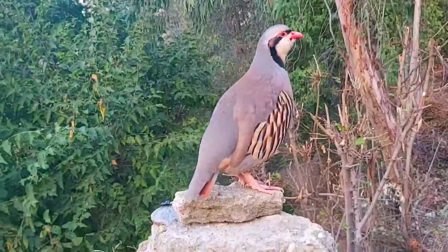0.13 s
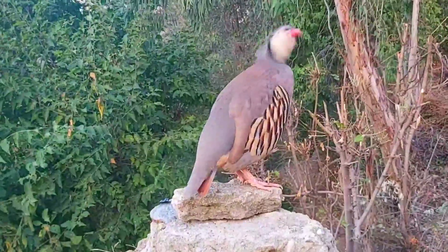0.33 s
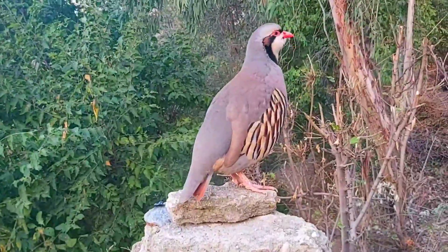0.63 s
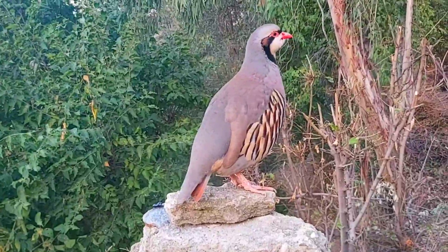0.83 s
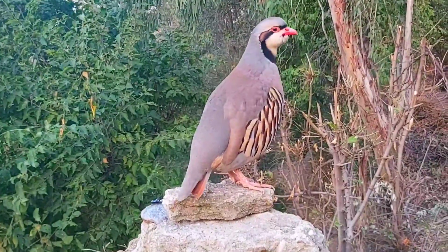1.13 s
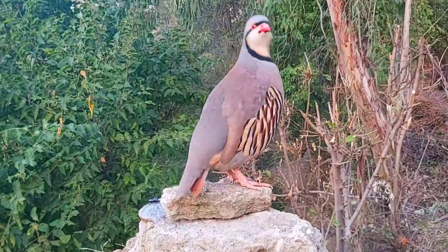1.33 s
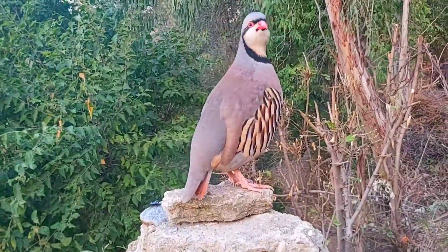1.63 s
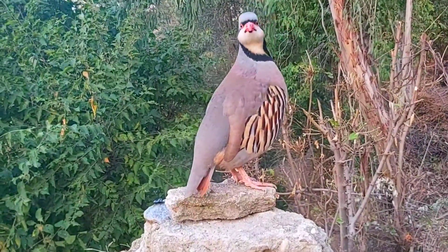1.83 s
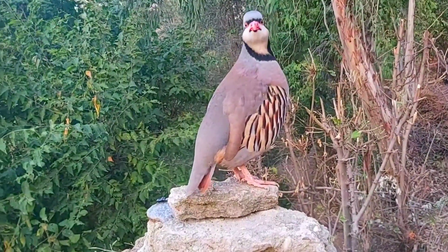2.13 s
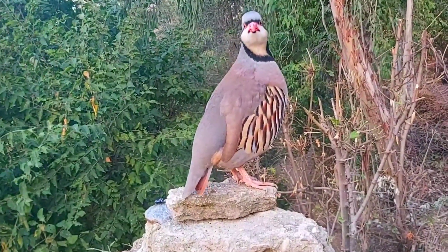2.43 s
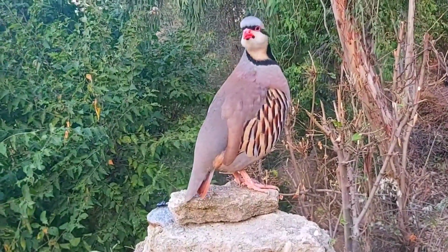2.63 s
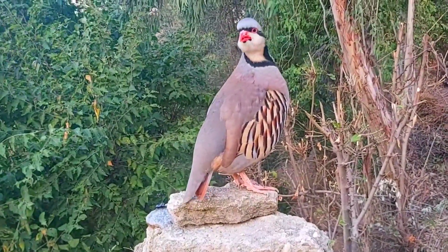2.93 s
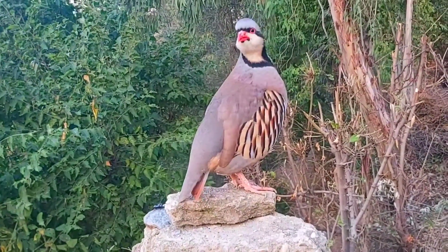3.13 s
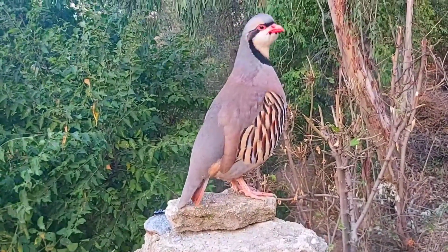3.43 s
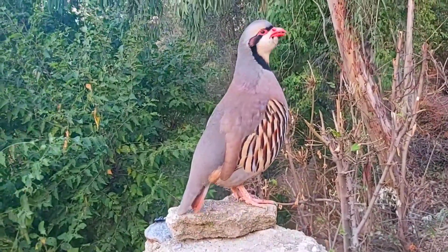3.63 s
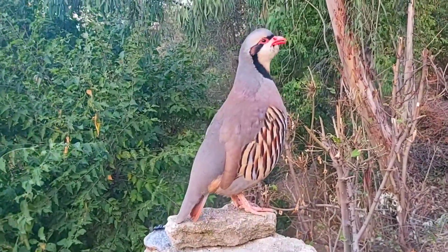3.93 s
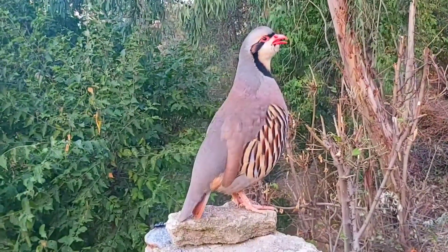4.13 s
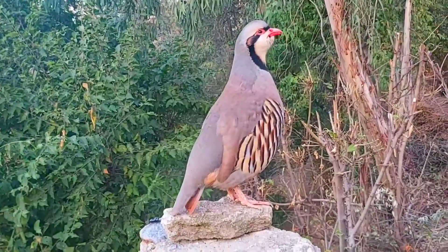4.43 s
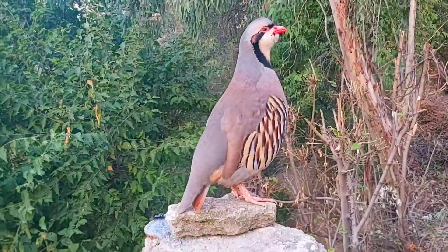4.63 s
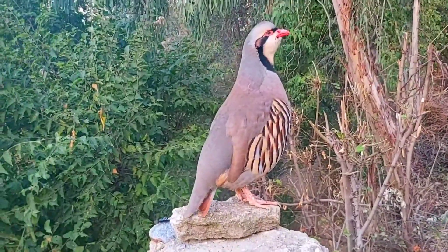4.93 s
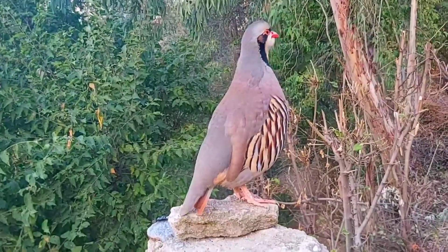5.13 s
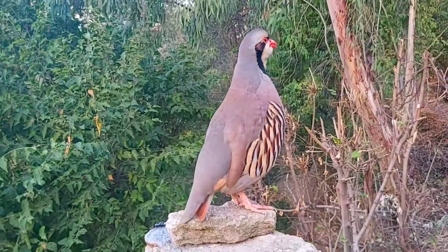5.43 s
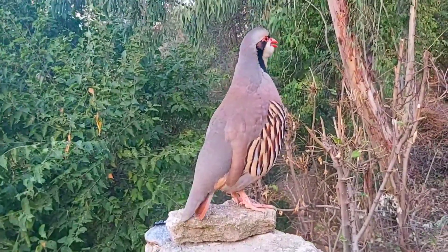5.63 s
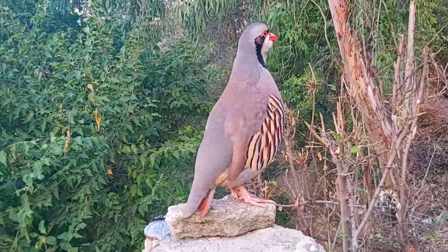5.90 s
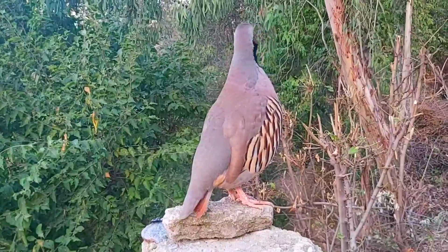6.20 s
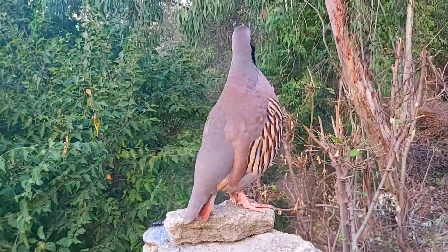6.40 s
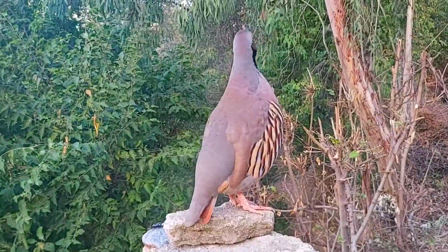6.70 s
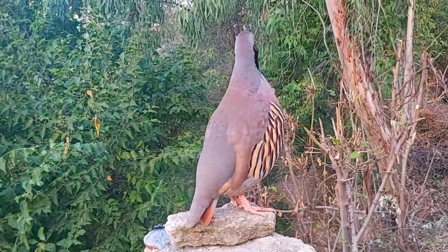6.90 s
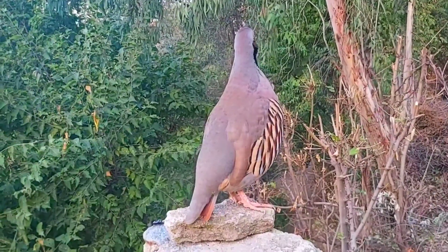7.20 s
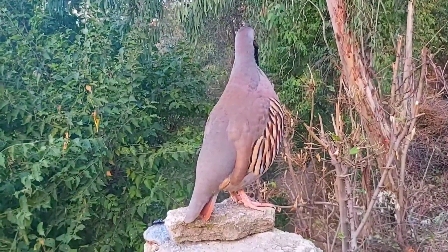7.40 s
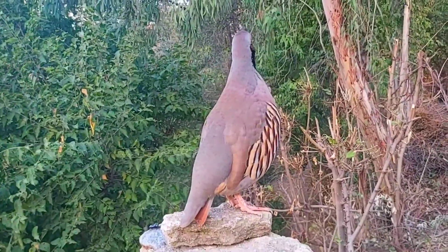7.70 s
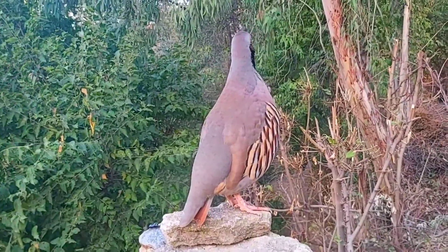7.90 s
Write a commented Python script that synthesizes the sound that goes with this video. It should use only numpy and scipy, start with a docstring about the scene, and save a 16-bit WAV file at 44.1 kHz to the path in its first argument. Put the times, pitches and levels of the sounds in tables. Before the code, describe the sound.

A chukar partridge on a rock calls close to the microphone in a quiet wooded hollow. It starts with soft, evenly spaced clucks, each followed by a lower mutter, then adds sharper falling yelps. These become loud, harsh, buzzy chuck-chu-kar phrases, quick and regular, repeated without pause until they stop abruptly. A soft rustle and faint hoarse calls in the bushes remain, with a slight short echo and very quiet air.

```python
"""Chukar partridge on a rock

A chukar partridge calls close to the microphone in a quiet wooded hollow. Soft clucks, some answered by low
mutters, grow into loud, harsh chuck-chu-kar phrases and stop. Each note is one or two pushes of air: a gliding
tone and a partly chaotic buzz of the syrinx (the bird's voice organ), heard through throat, chest and beak.
Faint calls, shuffles, thuds and far-off tones surround it; slope and bushes return a faint echo in soft air.
"""
import sys
import numpy as np
from scipy import signal
from scipy.fft import rfft, irfft, next_fast_len
from scipy.io import wavfile
from scipy.ndimage import uniform_filter1d, minimum_filter1d

SR = 44100
rng = np.random.default_rng(int(sys.argv[2]) if len(sys.argv) > 2 else 0)


def transcribe(signal):
    """Save signal, clipped to [-1, 1], as a 16-bit WAV file at the path in sys.argv[1]."""
    frames = np.atleast_2d(signal).T
    limited = np.clip(frames, -1, 1)
    pcm = np.round(limited * 32767).astype(np.int16)
    wavfile.write(sys.argv[1], SR, pcm)


N = 355181

# Colour of the rasp through a nearly closed beak. Each row: frequency in Hz, relative level in dB.
BEAK_CLOSED = [(900, -35.5), (1400, -5), (1640, 11), (1950, -14), (2280, 5.5), (2500, -6), (3000, -19),
               (3500, -15), (4100, -12.5), (4750, -6), (5200, -19.5), (5700, -4.5), (6600, -22),
               (8100, -39), (10000, -37.5), (15500, -35)]
# Beak open towards the listener. Each row: frequency in Hz, relative level in dB.
BEAK_FRONT = [(1400, -28), (1900, -10.5), (2300, 4), (2500, -17), (2900, -28.5), (3400, -10), (4050, -16.5),
              (4750, -2), (5250, -24), (5700, -12.5), (6500, -35.5), (8500, -42), (10000, -32.5),
              (15500, -29)]
# Beak open across the listener. Each row: frequency in Hz, relative level in dB.
BEAK_SIDE = [(1400, -27.5), (1950, -8.5), (2300, -4), (2550, -19.5), (3050, -25.5), (3700, -5.5),
             (4050, -13.5), (4450, 4), (5350, -35.5), (6400, -27), (7100, -15.5), (8500, -66),
             (9900, -27.5), (15500, -33.5)]
# Beak open away from the listener. Each row: frequency in Hz, relative level in dB.
BEAK_BACK = [(1400, -27.5), (1950, -14), (2300, -6), (2550, -13.5), (3050, -18), (3600, -7.5), (4350, 0),
             (4750, -18), (5300, -37), (5900, -27.5), (7000, -24), (8400, -70), (9900, -40.5), (15500, -50)]
# Beak open while the head is turning. Each row: frequency in Hz, relative level in dB.
BEAK_TURNING = [(1400, -29.5), (1950, -11), (2300, -6), (2550, -14), (3050, -22), (3700, -5.5), (4050, -9),
                (4400, -2), (5300, -38), (6300, -25.5), (7100, -19.5), (8500, -67.5), (9900, -30),
                (15500, -49.5)]
# Signs that put a sound into left and right with opposite polarity. Each row: the factor of one channel.
LEFT_RIGHT = np.array([[1], [-1]])


def undb(db):
    """Turn decibels into a gain."""
    return 10 ** (np.asarray(db) / 20)


def unit(x):
    """Scale to an rms (average strength) of 1."""
    return x / np.sqrt(np.mean(x ** 2) + 1e-20)


def along(points, hz):
    """Read (Hz, value) points on a log-frequency axis."""
    f, value = np.transpose(points)
    return np.interp(np.log(hz + 1), np.log(f), value)


def colour(x, points):
    """Filter by a (Hz, dB) spectrum."""
    n = x.shape[-1]
    size = next_fast_len(n)
    gain = undb(along(points, np.fft.rfftfreq(size, 1 / SR)))
    return irfft(rfft(x, size) * gain, size)[..., :n]


def resonate(x, hz, width_hz):
    """Let one resonance ring, with gain 1 at its centre."""
    b, a = signal.iirpeak(hz, hz / width_hz, fs=SR)
    return signal.lfilter(b, a, x)


def wander(n, rate):
    """Make smooth random motion with about `rate` turns a second and rms 1."""
    k = max(int(SR / rate), 1)
    smooth = uniform_filter1d(rng.standard_normal(n), k)
    return unit(uniform_filter1d(smooth, k))


def swell(t, rise, fall, roundness=1.865):
    """Rise from t = 0 and fall again, both rounded; times in seconds."""
    ramp = np.interp(t, [0, rise, rise + fall], [0, 1, 0])
    return np.sin(np.pi / 2 * ramp) ** roundness


def blown(x, push):
    """Give x the envelope `push`, with rms about 1 at its top."""
    return unit(x * push) * np.sqrt(np.mean(push ** 2))


def blend(clean, noisy, share):
    """Mix two sounds; `share` is the noisy part of the power, 0-1."""
    share = np.clip(share, 0, 1)
    return np.sqrt(1 - share) * unit(clean) + np.sqrt(share) * unit(noisy)


def add(out, x, start):
    """Mix x into out from `start` seconds."""
    i = max(int(start * SR), 0)
    out[..., i:i + x.shape[-1]] += x[..., :N - i]


def partridge():
    """Sing every note push by push, with the beak colour of the current head pose."""
    # Head poses. Each row: start in seconds, beak spectrum.
    poses = [(0, BEAK_CLOSED), (1.95, BEAK_FRONT), (3.55, BEAK_SIDE), (5.2, BEAK_TURNING),
             (6.27, BEAK_BACK)]
    # Six note shapes of one or two air pushes: a soft cluck, a low mutter, a falling yelp, the chuck, chu and kar.
    # Each row: start, rise and fall as shares of the note, level in dB, tone glide in octaves, buzz in Hz,
    # break-up 0-1, chest offset in dB, rasp offset in dB.
    cluck = [(0.0069, .57, 0.38, 0.02, -.2, 440, 0.15, -8.5, 0.005)]
    mutter = [(0, .26, .27, 0.044, -.7, 439.9, 0.011, -2, -17),
              (.43, 0.19, 0.37, 0.019, -0.73, 391.7, 0.32, 0.5, -18.5)]
    yelp = [(0.014, 0.39, .57, 0.0029, -.9, 415, 0.0051, 0.83, 0.088)]
    chuck = [(0, .31, .25, 0.01, -.2, 406.7, 0.058, -6.5, -2),
             (.35, .27, 0.3645, 0, -0.3493, 404.2, .4, 0, 0.23)]
    chu = [(0, .38, .28, 0.003, -.3, 439.9, 0.19, -9, 0), (.27, .25, .48, 0, -.4, 373.8, 0.75, -9, -5.5)]
    kar = [(0, .38, 0.15, 0.015, .3, 392.8, 0.54, -7, -7),
           (.36, .24, .4, 0, -0.365, 426.2, 0.046, 1.5, 0.5)]
    # Single soft clucks, then falling yelps.
    # Each row: start in seconds, length in seconds, level in dB, middle tone in Hz, roughness 0-1.
    clucks = [(.199, 0.051, -21, 948.4, 0.6), (0.573, 0.051, -19.5, 961, 0.33),
              (.971, 0.052, -18.5, 988, 0.65), (1.358, .047, -15, 1006, 0.65),
              (1.711, .052, -19, 825.5, 0.7), (3.332, .054, -20, 811, 0.77)]
    yelps = [(2.465, .054, -13, 1130, 0.37), (2.692, 0.045, -13.5, 1100, 0.26),
             (2.861, .051, -13, 1160, 0.54), (3.19, 0.058, -12.5, 1150, 0.34),
             (3.601, .051, -10, 1270, 0.6), (3.981, 0.053, -11, 1170, 0.35)]
    # Two-push notes: mutters that answer the first clucks, the long chuck that opens a phrase,
    # the short open chu in its middle and the swelling kar that closes it.
    # Each row: start in seconds, length in seconds, level in dB, middle tone in Hz, roughness 0-1,
    # second push in dB, turning point as a share of the note.
    mutters = [(0.307, 0.044, -24.5, 998.5, 0.74, -14, 0.81), (0.666, 0.066, -29, 880, 0.65, 0, 0.6),
               (1.069, .075, -22, 940, 0.42, -8.5, 0.38), (1.444, .08, -27, 940, 0.5, 3, .5),
               (1.808, 0.061, -22.5, 931, 0.65, -1, 0.48)]
    chucks = [(2.039, 0.096, -12, 1200, .6, -3, 0.43), (2.265, 0.083, -11.5, 1153, 0.26, -0.5, 0.41),
              (2.992, 0.092, -9.5, 1190, 0.34, -0.5, 0.36), (3.736, 0.076, -9.5, 1320, .65, -3, 0.52),
              (4.389, 0.074, -9, 1340, 0.77, -3, 0.59), (4.807, 0.085, -11.5, 1260, .65, 2, 0.54),
              (5.255, 0.082, -9.5, 1384, .5, -1, 0.45), (5.698, .08, -12.5, 1292, .65, 1.5, .56),
              (6.143, 0.078, -8, 1280, 0.46, -1, 0.51), (6.592, 0.083, -10, 1350, 0.42, 0, 0.53),
              (7.087, 0.076, -12.5, 1275, .6, 3, 0.57)]
    chus = [(2.61, 0.05, -8.5, 1201, 0.099, -7, 0.55), (4.118, 0.056, -12, 1094, 0.55, -3.5, .42),
            (4.551, 0.069, -7.5, 1129, .6, -8, 0.43), (4.978, 0.075, -11.5, 1138, 0.78, -9, .5),
            (5.423, 0.057, -9, 1200, .5, -18, 0.66), (5.869, 0.057, -8, 1198, 0.45, -12, .45),
            (6.312, .063, -6.5, 1293, 0.33, -11.5, .44), (6.773, 0.062, -12.5, 1092, 0.65, -11, .42),
            (7.258, 0.052, -14, 1209, 0.47, -1, 0.73)]
    kars = [(3.429, 0.067, -20.5, 1196, 0.69, 7.7, .55), (3.804, 0.066, -12, 1218, 0.44, 2.4, 0.54),
            (4.212, .069, -15, 1205, .6, 4, 0.46), (4.638, 0.056, -15, 1211, .5, 7.8, 0.32),
            (5.077, 0.062, -13.5, 1209, .45, 4.4, .5), (5.518, 0.073, -16.5, 1250, 0.51, 6.9, .5),
            (5.959, .076, -15.5, 1214, 0.61, 7.6, .48), (6.406, 0.075, -17, 1252, .65, 7, .5),
            (6.869, 0.098, -18, 1200, .6, 7.5, 0.54), (7.354, 0.066, -18, 1172, .5, 8.3, .48)]
    kinds = ((cluck, clucks), (mutter, mutters), (yelp, yelps), (chuck, chucks), (chu, chus), (kar, kars))

    out = np.zeros((2, N))
    t = np.arange(4096) / SR - .01  # starts early, to leave room before the push
    for shape, notes in kinds:
        for row in notes:
            beak = [spectrum for since, spectrum in poses if since <= row[0]][-1]
            for push in note(shape, *row):
                add(out, syllable(t, push, beak), push[0] + t[0])
    return out


def note(shape, start, length, db, tone_hz, rough, second_db=0, turn=.5):
    """Stretch a shape to the note's length, leaning early or late about the turning point."""
    # Rasp and chest over the whole bout: the rasp tends to grow, the chest is strongest in the first loud notes.
    # Each row: time in seconds, base rasp level in dB, base chest level in dB.
    bout = [(.2, -34, -40), (.6, -35.5, -37), (1.35, -30, -34), (1.8, -31, -33.5), (2.05, -38, -31.5),
            (2.6, -35.5, -30), (3.0, -32.5, -32), (3.35, -40.5, -35.5), (3.65, -32, -34),
            (4.15, -31.5, -35), (4.5, -27.5, -34), (5.0, -29.5, -36.5), (5.7, -32.5, -37.5),
            (6.4, -28, -36.5), (6.85, -31.5, -37), (7.4, -32, -39)]
    times, rasps_db, chests_db = np.transpose(bout)
    for push, accent_db in zip(shape, (0, second_db)):
        at, up, down, push_db, glide, buzz_hz, break_up, chest_db, rasp_db = push
        shares = np.interp([at, at + up, at + up + down], [0, .5, 1, 2], [0, turn, 1, 2])
        begin, peak, end = start + length * shares
        level_db = db + push_db + accent_db
        first_hz, last_hz = tone_hz * 2 ** (glide * np.array([-.5, .5]))
        push_rough = rough + break_up * (1 - rough)
        # chest and rasp follow the bout, not the loudness of the single note
        low_db = np.interp(start, times, chests_db) + chest_db - level_db
        edge_db = np.interp(start, times, rasps_db) + rasp_db - level_db
        yield (begin, peak - begin, end - peak, level_db, first_hz, last_hz, buzz_hz,
               push_rough, low_db, edge_db)


def syllable(t, row, beak, centre_hz=1200, chest_lag=0.0057, chest_noise=0.16, rasp_lead=0.2,
             rasp_linger=0.00055, cry_db=0.76, chest_trim_db=0.62, rasp_trim_db=0.24):
    """Sound one push of air from throat, chest and beak; lag and linger in s, lead a share of the rise."""
    # Low flutter of the chest. Each row: frequency in Hz, relative level in dB.
    chest_band = [(30, -30.5), (110, -23), (200, -17), (320, 0), (420, -9), (560, 0), (900, -36.5),
                  (2000, -69.5)]
    _, rise, fall, db, first_hz, last_hz, _, rough, chest_db, rasp_db = row
    rise, fall = max(rise, .004), max(fall, .004)
    rough = np.clip(rough, 0, .85)
    tone, buzz = syrinx(t, row)
    # the throat resonance half follows the tone
    throat_hz = (centre_hz + (first_hz + last_hz) / 2) / 2
    throat = cry(tone, buzz, swell(t, rise, fall), rough, throat_hz)
    # the buzz itself radiates from the chest, a little late
    hum = colour(np.sin(buzz), chest_band)
    breath = colour(turbulence(buzz), chest_band)
    chest = blown(blend(hum, breath, chest_noise), swell(t - chest_lag, rise, fall))
    # the rasp bites before the tone is at its loudest
    lead = np.clip(rasp_lead, 0, .5) * rise
    edge = rasp(buzz, swell(t, rise - lead, fall + lead + rasp_linger), rough, beak)
    voice = undb(cry_db) * throat
    voice = voice + undb(chest_db + chest_trim_db) * chest
    return undb(db) * (voice + undb(rasp_db + rasp_trim_db) * edge)


def syrinx(t, row, sag_rate=10, lowest_hz=285):
    """Make the phases of two voices, a strong gliding tone and a lower buzz; roughness shakes both."""
    _, rise, fall, _, first_hz, last_hz, buzz_hz, rough, chest_db, _ = row
    from_peak = np.clip(t, -.005, rise + fall + .005) - rise
    glide = (last_hz - first_hz) / (rise + fall)  # Hz per second
    peak_hz = first_hz + glide * rise
    waver = 1 + .09 * rough * wander(len(t), 160)
    # a tense buzz follows the tone; a slack one sags as the air runs out and sounds more from the chest
    slack = np.interp(chest_db, [-30, -24], [0, 1])
    bend = (1 - slack) * glide / peak_hz - slack * sag_rate  # share of the buzz pitch per second
    tone_path = peak_hz + glide * from_peak
    buzz_path = np.maximum(buzz_hz * (1 + bend * from_peak), lowest_hz)
    return 2 * np.pi * np.cumsum(np.array([tone_path, buzz_path]) * waver, axis=1) / SR


def turbulence(buzz):
    """Pulse air noise, as it escapes when the membranes open, over a steady hiss."""
    return rng.standard_normal(len(buzz)) * (0.31 + np.cos(buzz / 2) ** 4)


def cry(tone, buzz, push, rough, throat_hz, buzz_depth=0.48, throat_width_hz=400):
    """Chop the tone by the buzz; driven hard, pulses go strong-weak and then chaotic."""
    # Band that the throat lets out. Each row: frequency in Hz, level in dB.
    throat_band = [(150, -43), (400, -22), (600, -16), (730, -5), (1000, -2), (1400, -1.5), (1580, -13.5),
                   (1800, -28.5), (2400, -40), (4000, -78.5)]
    doubling = .8 * rough ** 2 * np.cos(buzz / 2 + rng.uniform(0, 2 * np.pi))  # half the buzz rate
    voiced = np.sin(tone) * np.exp(buzz_depth * np.cos(buzz) + doubling)
    harsh = resonate(colour(turbulence(buzz), throat_band), throat_hz, throat_width_hz)
    chaos = .7 * rough ** 2
    mixed = blend(colour(voiced, throat_band) * push, harsh * push, chaos)
    return mixed * np.sqrt(np.mean(push ** 2))


def rasp(buzz, push, rough, beak, noise_share=0.42, flutter_db=1.0, flutter_rate=100):
    """Send overtones and fluttering hiss through a beak whose gape differs a little each time, in stereo."""
    # Treble that differs between the two ports. Each row: frequency in Hz, level in dB.
    spray = [(1500, -21.5), (4500, -15.5), (7000, -11.5), (10000, -5.5)]
    gape = 1 + .02 * rng.standard_normal()
    beak = [(hz * gape, db) for hz, db in beak]
    overtones = np.cos(np.outer(np.arange(1, 27), buzz)).sum(axis=0)
    flutter = undb(flutter_db * wander(len(buzz), flutter_rate))
    edge = blend(overtones, turbulence(buzz), noise_share + .5 * rough)
    mid = blown(flutter * colour(edge, beak), push)
    hiss = blown(flutter * colour(turbulence(buzz), beak), push)
    return mid + colour(hiss, spray) * LEFT_RIGHT


def faint_calls(width_hz=170, upper_width_hz=170):
    """Make short hoarse notes in the bushes: noise through a low and a high narrow resonance."""
    # Each row: middle in seconds, length in seconds, pitch in Hz, level in dB,
    # upper partial in Hz, its level against the lower one in dB.
    calls = [(0.448, 0.029, 1700, -55, 4000, -23), (0.521, 0.056, 1670, -52.5, 4130, -18),
             (7.66, 0.075, 1160, -57.5, 3830, -15), (7.824, 0.04, 1280, -59, 3900, -11),
             (7.983, 0.061, 1306, -60.5, 3850, -10.5)]
    out = np.zeros(N)
    t = np.arange(4096) / SR
    for s, length, hz, db, upper_hz, upper_db in calls:
        breath = rng.standard_normal(len(t))
        push = swell(t, length / 2, length / 2)
        # each resonance is applied twice, the second time twice as wide
        low = resonate(resonate(breath, hz, width_hz), hz, 2 * width_hz)
        high = resonate(resonate(breath, upper_hz, upper_width_hz), upper_hz, 2 * upper_width_hz)
        call = blown(low, push) + undb(upper_db) * blown(high, push)
        add(out, undb(db) * call, s - length / 2)
    return out


def shuffles(grain_db=3):
    """Make dull rustles that die away: coloured noise of uneven strength."""
    # Soft shuffles. Each row: start in seconds, rise in seconds, decay time in seconds, level in dB.
    moves = [(0.0, 0.0017, 0.081, -51), (7.452, 0.012, 0.04, -37)]
    # Their colour. Each row: frequency in Hz, relative level in dB.
    rustle_colour = [(35, -46), (60, -33), (202, -14.5), (295, -5.5), (364, -2.5), (520, -2.5), (842, -12),
                     (1580, -11.5), (2000, -21), (2400, -39), (4320, -32), (9000, -74), (11700, -93),
                     (19800, -120)]
    out = np.zeros(N)
    t = np.arange(SR // 2) / SR
    for s, rise, decay, db in moves:
        grain = rng.standard_normal(len(t)) * undb(grain_db * wander(len(t), 81))
        rustle = unit(colour(grain, rustle_colour))
        envelope = np.interp(t, [0, rise], [0, 1]) * np.exp(-t / decay)
        add(out, undb(db) * rustle * envelope, s)
    return out


def thuds(first_hz=190, last_hz=80, length=0.031):
    """Make soft low bumps: short sine swells that fall in pitch; length in seconds."""
    # Each row: middle in seconds, peak level in dB.
    bumps = [(0.64, -52), (1.516, -45.5)]
    out = np.zeros(N)
    t = np.arange(SR // 8) / SR
    phase = 2 * np.pi * np.cumsum(np.interp(t, [0, length], [first_hz, last_hz])) / SR
    for s, db in bumps:
        add(out, undb(db) * np.sin(phase) * swell(t, length / 2, length / 2), s - length / 2)
    return out


def far_tones(waver=.012):
    """Make faint sine tones from the distance, their pitch wavering by a small share."""
    # Each row: middle in seconds, length in seconds, pitch in Hz, level in dB.
    tones = [(0.043, 0.17, 267, -55.5), (.87, 0.38, 754, -64), (2.1, 0.4, 210, -65),
             (3.106, 0.12, 1864, -60), (3.54, 0.12, 2164, -72), (3.948, 0.091, 2030, -55.5),
             (5.83, 0.094, 2140, -53.5)]
    out = np.zeros(N)
    t = np.arange(SR) / SR
    for s, length, hz, db in tones:
        phase = 2 * np.pi * np.cumsum(hz * (1 + waver * wander(SR, 60))) / SR
        start = max(s - length / 2, 0)  # a tone may already be under way at the beginning
        envelope = swell(t + start - s + length / 2, length / 2, length / 2)
        add(out, undb(db) * np.sqrt(2) * np.sin(phase) * envelope, start)
    return out


def ports(x):
    """Bring the direct sound to two microphone ports with different level and phase."""
    # Each row: frequency in Hz, left minus right in dB.
    balance = [(60, -5.5), (110, 3.5), (200, -5.5), (380, -1.5), (700, -2), (1290, 0.5), (2380, 3),
               (4400, -7), (8120, 12), (15000, -1.5)]
    # Each row: frequency in Hz, radians by which left leads.
    lead = [(0, 0), (1640, 0.27), (2150, 1.07), (3360, 0.5), (3960, 1.5), (4740, 0), (5430, -1.5),
            (5860, -1.5), (7410, -1.35), (9650, 7), (10100, 5), (12900, 10.5), (14300, -7), (16000, -1.5)]
    size = next_fast_len(N)
    hz = np.fft.rfftfreq(size, 1 / SR)
    # each port takes half of the difference
    half = undb(along(balance, hz) / 2) * np.exp(1j * along(lead, hz) / 2)
    return irfft(rfft(x, size) * np.array([half, 1 / half]), size)[:, :N]


def hollow(x, near_db=-27, near_t60=0.28, far_db=-35, far_t60=0.32, build_up=0.26, slope_db=-39, slope_lag=0.053):
    """Echo by quick scatter from rocks, one slope echo and a thin foliage tail; times in seconds."""
    # Colour of the echo. Each row: frequency in Hz, level in dB.
    echo_colour = [(100, 6.5), (350, 10), (750, 9.5), (1150, -0.5), (1450, 1), (2000, 8), (4300, 4),
                   (12000, 18)]
    t = np.arange(SR) / SR
    grains = rng.standard_normal((2, 2, len(t)))
    # each t60 is the time in which the noise fades by 60 dB
    near = unit(grains[0] * undb(-60 * t / near_t60) * np.minimum(t / 0.0009, 1))
    far = unit(grains[1] * undb(-60 * t / far_t60) * np.minimum(t / build_up, 1))
    response = (undb(near_db) * near + undb(far_db) * far) / np.sqrt(len(t))
    response[:, int(slope_lag * SR)] += undb(slope_db)
    # the echo differs between left and right, least around 500 Hz
    mid, side = response.mean(axis=0), (response[0] - response[1]) / 2
    side = colour(side, [(100, -1.5), (500, -7), (1200, 0.5), (2500, 2)])
    stereo = np.array([mid + side, mid - side])
    return signal.fftconvolve(colour(x, echo_colour)[None], stereo, axes=1)[:, :N]


def air(level_db=-68.5, side_db=-5):
    """Make very quiet outdoor air: coloured stereo noise that swells a little."""
    # Each row: frequency in Hz, relative level in dB.
    air_colour = [(15, -39), (25, -16.5), (60, -2.5), (322, -4.5), (457, -8.5), (523, 0.5), (895, -11.5),
                  (1300, -12), (1530, -11.5), (2010, -17), (2700, -23.5), (4040, -23), (7910, -29),
                  (11500, -22), (15500, -32.5)]
    mid, side = unit(colour(rng.standard_normal((2, N)), air_colour))
    swell_db = 1.2 * wander(N, 3)
    return undb(level_db + swell_db) * (mid + undb(side_db) * side * LEFT_RIGHT)


def scene():
    """Mix the bird, the small sounds around it, their echo and the air."""
    direct = partridge() + faint_calls() + shuffles() + far_tones() + thuds()
    return ports(direct) + hollow(direct.mean(axis=0)) + air()


def record(dry, ceiling=1.0, top_hz=15600):
    """Turn down the loudest peaks with a fast limiter, then cut the top of the treble."""
    gain = np.minimum(1, ceiling / (np.abs(dry).max(axis=0) + 1e-9))
    gain = uniform_filter1d(minimum_filter1d(gain, size=301), size=301)
    low_pass = signal.ellip(10, .2, 80, top_hz, fs=SR, output="sos")
    return signal.sosfilt(low_pass, dry * gain)


dry = scene()
out = record(dry)
transcribe(out)
```